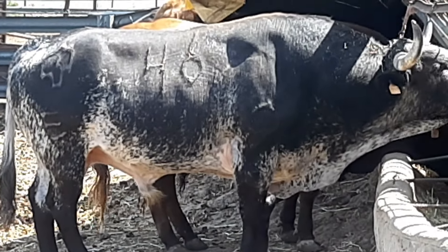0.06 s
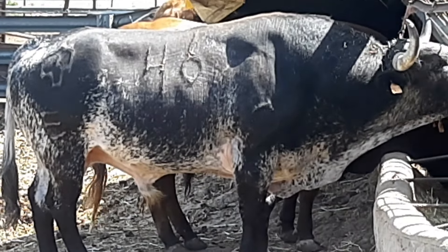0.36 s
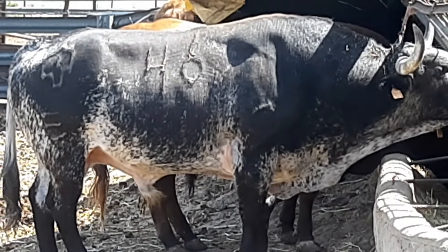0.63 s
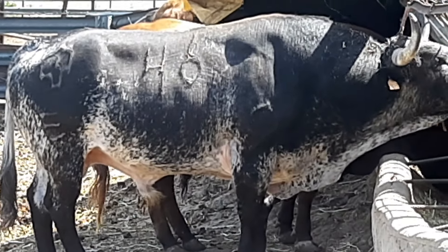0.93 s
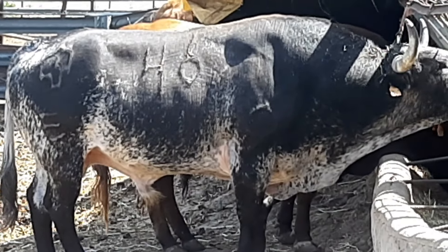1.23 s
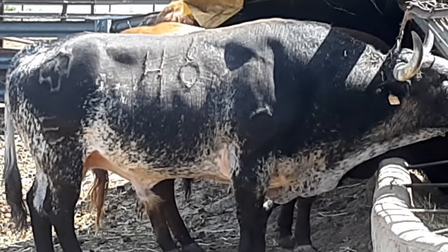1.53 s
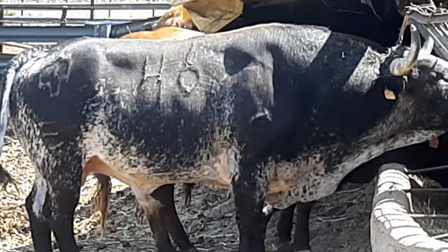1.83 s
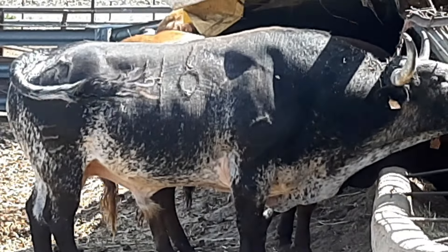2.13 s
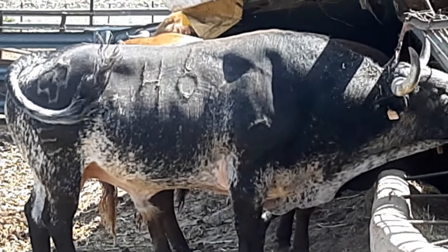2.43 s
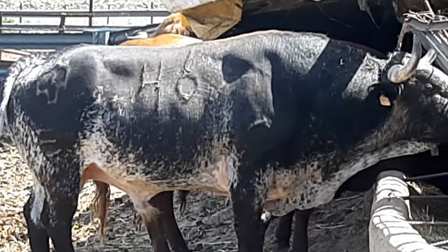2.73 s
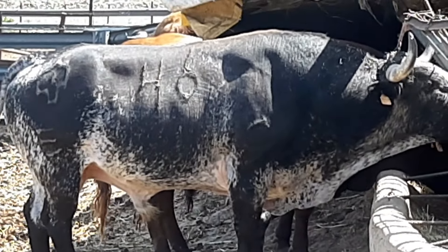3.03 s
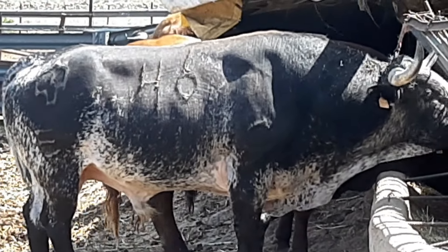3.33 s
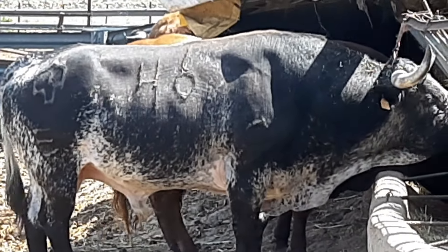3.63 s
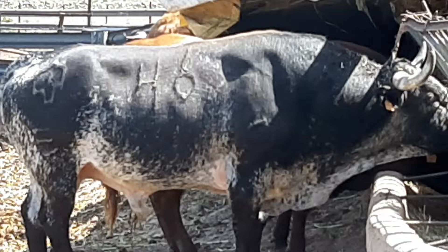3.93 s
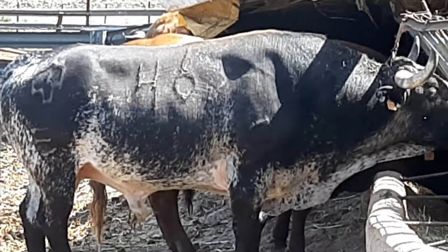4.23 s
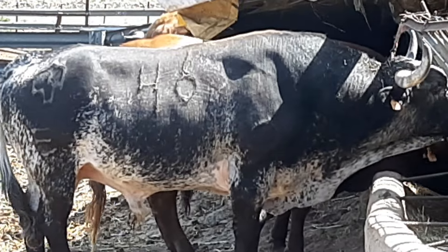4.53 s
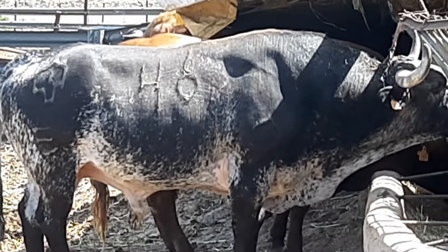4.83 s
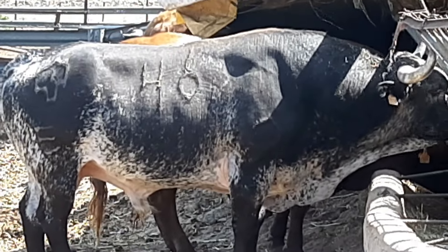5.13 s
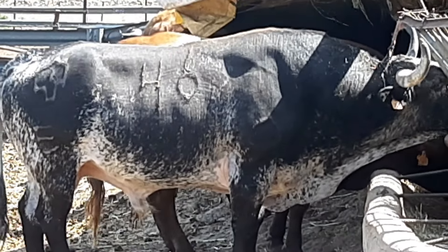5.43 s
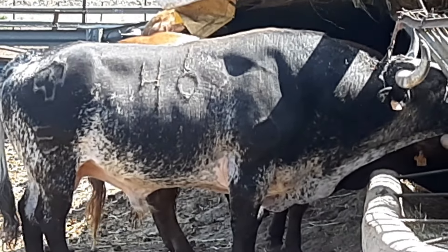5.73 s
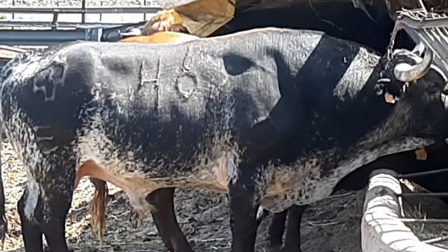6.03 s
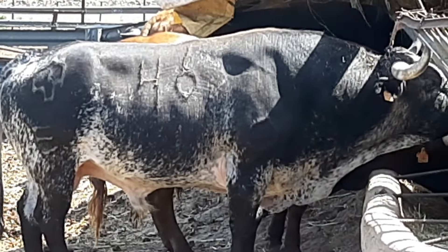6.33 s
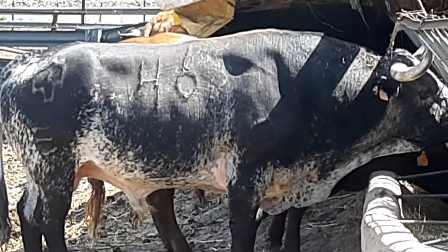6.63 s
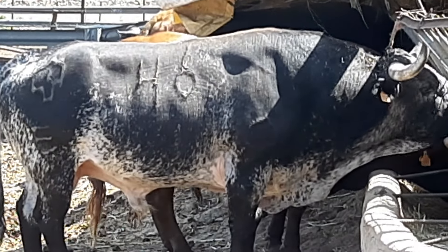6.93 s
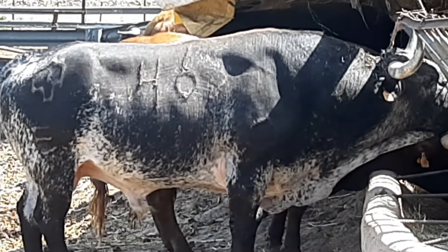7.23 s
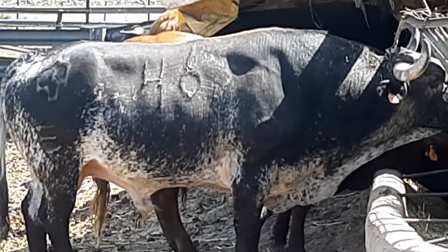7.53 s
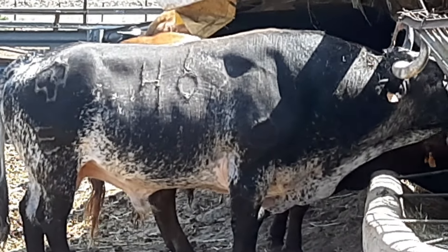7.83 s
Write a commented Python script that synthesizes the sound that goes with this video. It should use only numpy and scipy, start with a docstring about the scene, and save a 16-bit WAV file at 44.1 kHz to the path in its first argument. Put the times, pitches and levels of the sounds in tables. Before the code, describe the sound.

Wind buffets the microphone with low thumps at the start, then eases. A small bird chirps short phrases nearby while bulls quietly rummage and crunch dry feed, with faint tail swishes and light knocks on the trough. Near the end a horn scrapes a steel feeder with a short, ringing squeal. The outdoor pen is heard on the right, with a few dull finger bumps on the left.

```python
"""Bulls at a feed trough

Under a shed roof, muzzles rummage and crunch in dry feed, a tail swishes, and a horn scrapes the steel
feeder, whose resonances are driven by friction. A small bird whistles two phrases nearby and another
calls farther off. Turbulent wind buffets the open right microphone; the covered left one gives its
own hiss, a few finger bumps and only a trace of the pen."""
import sys
import numpy as np
from scipy import signal
from scipy.fft import rfft, irfft, next_fast_len
from scipy.io import wavfile
from scipy.ndimage import uniform_filter1d

SR = 44100
rng = np.random.default_rng(int(sys.argv[2]) if len(sys.argv) > 2 else 0)


def materialize(psi):
    """Save the field psi as 16-bit PCM at rate SR to the path in sys.argv[1].

    A 1-D psi becomes a single channel; in a 2-D psi each row is a channel.
    """
    bounded = np.clip(np.atleast_2d(psi).T, -1, 1)
    quanta = np.round(bounded * 32767).astype(np.int16)
    wavfile.write(sys.argv[1], SR, quanta)


N = 346961
TIME = np.arange(N) / SR


def from_db(db):
    """Amplitude ratio of a level; all levels are relative, ahead of the mixing gains."""
    return 10 ** (np.asarray(db) / 20)


def rms_one(x):
    """Normalisation to unit power."""
    return x / np.sqrt(np.mean(x ** 2) + 1e-20)


def colour(x, spectrum):
    """Spectral shaping at unit power, falling 24 dB per octave beyond the listed band."""
    hz, level_db = np.transpose(spectrum)
    size = next_fast_len(N)
    bins = np.maximum(np.fft.rfftfreq(size, 1 / SR), 1)
    outside_db = 24 * abs(np.log2(bins / np.clip(bins, hz[0], hz[-1])))
    gain = from_db(np.interp(np.log(bins), np.log(hz), level_db) - outside_db)
    return rms_one(irfft(rfft(x, size) * gain, size)[:N])


def noise(spectrum):
    """Gaussian noise with a given spectrum."""
    return colour(rng.standard_normal(N), spectrum)


def drift(per_s):
    """Random modulation of unit power, interpolated between independent values."""
    knots = rng.standard_normal(6000)
    return rms_one(np.interp(TIME * per_s, np.arange(len(knots)), knots))


def grains(per_s, spread_db, smooth):
    """Shot noise: random snaps of uneven size over a smooth friction noise."""
    sizes = from_db(spread_db * np.minimum(rng.exponential(1, N), 4)) * rng.choice([-1, 1], N)
    snaps = rms_one(sizes * (rng.random(N) < per_s / SR))
    return rms_one(snaps + smooth * rng.standard_normal(N))


def resonate(x, hz, width_hz):
    """A damped two-pole resonator with unit peak gain."""
    r = np.exp(-np.pi * width_hz / SR)
    feedback = [1, -2 * r * np.cos(2 * np.pi * hz / SR), r * r]
    return signal.lfilter(np.array([1, 0, -1]) * (1 - r * r) / 2, feedback, x)


def shed(x, early_db, early_t60, tail_db, tail_t60):
    """Reverberation: direct sound, sparse reflections from roof and rails, and a diffuse tail."""
    t = TIME[:SR]
    decays = from_db(-60 * t / np.array([[early_t60], [tail_t60]])) * (t > .004)
    early, tail = rng.standard_normal((2, SR)) * decays
    early *= rng.random(SR) < 700 / SR
    response = (from_db(early_db) * rms_one(early) + from_db(tail_db) * rms_one(tail)) / np.sqrt(SR)
    response[0] = 1
    return signal.fftconvolve(x, response / np.linalg.norm(response))[:N]


def swells(rows):
    """An envelope made of Gaussian swells."""
    return sum(from_db(db) * np.exp(-((TIME - s) / half_width) ** 2) for s, db, half_width in rows)


def swell_and_fade(peak_s, swell_s, t60):
    """An envelope with quadratic growth and exponential decay."""
    growth = np.clip((TIME - peak_s) / swell_s + 1, 0, 1) ** 2
    return growth * from_db(-60 * np.maximum(TIME - peak_s, 0) / t60)


def held(full_s, hold_s, db, t60, rise_db_per_s):
    """An envelope with exponential growth until full_s, a plateau and exponential decay."""
    attack_db = rise_db_per_s * np.maximum(full_s - TIME, 0)
    decay_db = 60 * np.maximum(TIME - full_s - hold_s, 0) / t60
    return from_db(db - attack_db - decay_db) + 1e-12


def pressure_pulses(rows, cycles):
    """Gaussian-windowed sines: each is one smooth push and pull on the diaphragm."""
    out = np.zeros(N)
    for centre_s, db, hz in rows:
        near = abs(TIME - centre_s) < 2 / hz
        turns = hz * (TIME[near] - centre_s)
        out[near] -= from_db(db) * np.sin(2 * np.pi * turns) * np.exp(-(turns / cycles) ** 2)
    return out


# Spectrum of the outdoor background: frequency_hz, density_db
YARD_SPECTRUM = [(30, -3), (70, 1.5), (140, -3), (250, -15), (380, -9.5), (620, -7.5), (1100, -20.5),
                 (2600, -27), (4200, -20), (5600, -20.5), (6900, -15.5), (8300, -32.5), (15000, -30)]

def yard():
    """Ambient noise: a faint broad band whose level barely wavers."""
    return from_db(-73) * noise(YARD_SPECTRUM) * from_db(0.21 * drift(2.8))


# Spectrum of a microphone's own noise: frequency_hz, density_db
SELF_NOISE_SPECTRUM = [(25, 1), (90, 2.5), (170, -16), (300, -18.5), (1000, -24.5), (3000, -26.5),
                       (8500, -28.5), (11500, -25.5), (16000, -26)]

def microphone_hiss():
    """Self-noise: a steady floor, independent in each microphone."""
    return from_db(-70) * noise(SELF_NOISE_SPECTRUM)


# Spectra of large eddies and small whirls: frequency_hz, density_db
EDDY_SPECTRUM = [(25, -28.5), (55, 3), (85, 6.5), (150, -1), (215, -12.5), (310, -15.5), (600, -43.5),
                 (1200, -74.5)]
WHIRL_SPECTRUM = [(280, 12), (400, 1), (600, -8), (900, -25)]
# Gusts on the open microphone: centre_s, level_db, half_width_s
WIND_GUSTS = [(.004, -22, 0.017), (.14, -46.5, 0.069), (.335, -55, 0.013), (.44, -45.5, 0.086),
              (.605, -32, 0.024), (.77, -49, 0.053), (.96, -46.5, 0.072), (1.14, -49, 0.049),
              (1.33, -55, 0.046), (1.55, -60, 0.078), (1.71, -58.5, 0.068), (2.02, -60.5, 0.02),
              (2.57, -56, 0.053), (3.31, -63, 0.032), (3.47, -62, 0.074), (3.72, -63, 0.05),
              (4.55, -69.5, 0.072), (4.94, -66.5, 0.061), (5.41, -66, 0.022), (5.63, -60.5, 0.023),
              (6.15, -62.5, 0.089), (6.66, -49.5, 0.023), (6.75, -51, 0.046), (6.88, -50, 0.064),
              (7.1, -56, 0.031), (7.25, -52.5, 0.07), (7.34, -52.5, 0.033), (7.53, -65, .05)]
# Single puffs of air: centre_s, level_db, frequency_hz
WIND_PUFFS = [(.139, -31, 140), (.327, -30.5, 109), (.414, -30.5, 146), (.503, -24.5, 144.7),
              (.516, -29.5, 151), (.5925, -8.5, 130), (.6065, -19, 119.5), (.621, -22.5, 140),
              (.657, -31, 113), (.710, -22, 88.7), (.922, -27, 121), (.948, -31, 120), (1.122, -31.5, 110),
              (1.161, -29, 113), (2.619, -40.5, 117.5), (6.871, -39, 89), (7.22, -34, 97)]

def wind():
    """Turbulence: eddies vary the pressure at the port, and strong puffs break up into small whirls."""
    breeze = from_db(-53 - 15 * TIME) + from_db(-83.5)  # dies away to a lull
    strength = breeze + swells(WIND_GUSTS)
    eddies = rms_one(noise(EDDY_SPECTRUM) * from_db(3.6 * drift(45)))
    puffs = from_db(-5) * pressure_pulses(WIND_PUFFS, cycles=0.49)
    puff_envelope = np.sqrt(np.maximum(uniform_filter1d(puffs ** 2, size=300), 0))
    whirls = from_db(-19.5) * puff_envelope * noise(WHIRL_SPECTRUM)
    return strength * eddies + puffs + whirls


# Spectrum of sliding straw: frequency_hz, density_db
STRAW_SPECTRUM = [(2000, -17.5), (3200, -10), (4200, -1.5), (5500, -1.5), (6900, -2), (7600, -10.5),
                  (8400, -35.5), (14000, -33)]
# Moments when the straw comes to rest: centre_s, half_width_s
STRAW_RESTS = [(0.688, 0.051), (1.53, 0.13), (3.16, 0.18), (3.844, 0.06), (6.796, 0.29)]
# Tufts being pulled: centre_s, level_db, half_width_s
STRAW_TUFTS = [(.45, -73, 0.024), (1.79, -77, 0.043), (2.51, -70.5, 0.019), (2.73, -73.5, 0.073),
               (3.33, -70.5, 0.038), (3.97, -75.5, 0.063), (4.05, -60, 0.018), (5.08, -78.5, 0.04),
               (5.58, -72.5, 0.033), (5.92, -80, 0.21), (7.04, -76, 0.05), (7.86, -74, 0.034)]

def straw():
    """Sliding friction: loose stalks rustle unevenly, rest at times and swell when a tuft is pulled."""
    rustle = colour(grains(per_s=4000, spread_db=3, smooth=.6), STRAW_SPECTRUM)
    moving = np.prod([1 - np.exp(-((TIME - s) / width) ** 2) for s, width in STRAW_RESTS], axis=0)
    sliding = moving * from_db(-76 + 2 * drift(11))
    return (sliding + swells(STRAW_TUFTS)) * rustle


# Contour of each bird syllable, by name: offset_s, pitch_hz, level_db
SYLLABLE_CONTOURS = { "lift": [(0, 3970, 1), (.04, 3960, -6), (.08, 3830, -2), (.105, 4050, 1),
                     (.125, 4650, 4)], "rise": [(0, 2950, -19), (.022, 2980, -3.5), (.032, 3120, 1.5),
                     (.055, 3700, -1.5), (.072, 4100, 1), (.092, 4260, -16.5)], "flick": [(0, 5470, -5),
                     (.015, 6300, 5), (.035, 6200, -20)], "flourish": [(0, 3150, -21), (.017, 5250, -17),
                     (.022, 4180, -11), (.036, 4060, 0), (.044, 3300, -16), (.054, 3100, -17),
                     (.067, 3750, -4), (.074, 3200, -11), (.086, 3200, -10), (.097, 2750, -20),
                     (.122, 2450, -19)], "drop": [(0, 2814, -11), (.02, 2667, 4), (.035, 2380, 7),
                     (.055, 2020, -0.5)], "tick": [(0, 5650, -7), (.014, 5880, 0), (.021, 5300, -1),
                     (.034, 4050, -6)], "swoop": [(0, 6000, -7), (.023, 5280, -3), (.044, 5750, -7),
                     (.072, 4400, 0), (.097, 2650, -4)], "buzz": [(0, 3006, -1.5), (.03, 3910, 7.5),
                     (.075, 4400, -3)], "pip": [(0, 3880, 0), (.03, 3790, 7), (.07, 3810, 2)]}
# Hoarseness of each syllable, by name: rms_pitch_fraction
SYLLABLE_RASP = {"lift": .008, "rise": .021, "flourish": .062, "drop": .06, "tick": .052, "swoop": .03,
                 "buzz": .095, "pip": .003, "flick": .04}

def whistles(calls):
    """Frequency modulation: each syllable is a gliding tone with a faint octave, hoarse with quiver."""
    out, quiver, flutter_db = np.zeros(N), drift(700), 1.6 * drift(150)
    for start_s, name, level_db in calls:
        offset_s, hz, contour_db = np.transpose(SYLLABLE_CONTOURS[name])
        span = (TIME >= start_s) & (TIME < start_s + offset_s[-1])
        t = TIME[span] - start_s
        fade = np.clip(np.minimum(t, offset_s[-1] - t) / 0.0013, 0, 1)
        pitch_hz = np.interp(t, offset_s, hz) * (1 + SYLLABLE_RASP[name] * quiver[span])
        phase = 2 * np.pi * np.cumsum(pitch_hz) / SR
        tone = np.sin(phase) + from_db(-37) * np.sin(2 * phase)
        out[span] += fade * from_db(level_db + np.interp(t, offset_s, contour_db) + flutter_db[span]) * tone
    return out


# Syllables of the near and the far bird: start_s, syllable, level_db
NEAR_BIRD_SONG = [(0.051, "lift", -64.5), (0.334, "rise", -60), (.55, "rise", -60), (0.772, "flick", -68),
                  (0.786, "flourish", -40), (0.929, "drop", -69), (1.035, "drop", -64),
                  (1.149, "tick", -56), (1.194, "tick", -55.5), (1.24, "tick", -57), (2.49, "flick", -65),
                  (2.503, "flourish", -43), (2.972, "pip", -75), (4.12, "lift", -64.5),
                  (4.397, "rise", -59.5), (4.611, "rise", -54.5), (4.817, "rise", -54.5),
                  (4.976, "drop", -65.5), (5.088, "drop", -62.5), (5.2, "tick", -59.5),
                  (5.244, "tick", -57), (5.292, "tick", -62)]
FAR_BIRD_CALLS = [(3.571, "swoop", -62), (3.675, "buzz", -61.5), (6.35, "swoop", -64.5),
                  (6.44, "buzz", -68)]

def birds():
    """Direct-to-reverberant ratio falls with distance: the far bird carries a little more echo."""
    near = shed(whistles(NEAR_BIRD_SONG), early_db=-4.5, early_t60=0.2, tail_db=-8.5, tail_t60=0.57)
    far = shed(whistles(FAR_BIRD_CALLS), early_db=-3, early_t60=0.13, tail_db=-8, tail_t60=0.55)
    return near + far


# Spectra of dull pushing, hollow grinding and bright crunching: frequency_hz, density_db
PUSH_SPECTRUM = [(130, 4), (220, 8.5), (380, 9.5), (600, 4), (850, -2), (1150, -13), (2000, -42.5)]
GRIND_SPECTRUM = [(520, 1), (720, 4), (900, -1), (1070, 0), (1300, -5), (1550, -1.5), (1850, -8.5),
                  (3000, -30.5), (5000, -35)]
CRUNCH_SPECTRUM = [(1200, -6.5), (1700, 2.5), (2300, 5), (2600, 7), (3000, 9.5), (3600, 10.5), (4050, 10),
                   (4500, 1), (7000, -14), (8500, -37)]
# Muzzle strokes in the feed: peak_s, swell_s, t60_s, push_db, grind_db, crunch_db
MUZZLE_STROKES = [(.22, 0.14, 0.71, -63, -79, -84), (.59, 0.095, 0.24, -56.5, -92, -82),
                  (1.331, 0.053, 0.78, -73, -102, -76), (2.38, 0.17, 3.2, -77.5, -83, -88),
                  (3.432, 0.091, 0.79, -64.5, -64.5, -65), (4.048, 0.068, 1.14, -65.5, -68, -69.5),
                  (4.68, 0.023, 0.25, -76, -73, -100), (4.759, 0.024, 0.71, -80, -69.5, -95),
                  (5.524, 0.025, 0.9, -76.5, -96, -64.5), (5.579, 0.0059, 0.042, -100, -68, -58),
                  (5.72, 0.1, 0.33, -64, -71.5, -77), (5.774, 0.01, 0.19, -75, -63.5, -75),
                  (6.079, 0.024, 1.7, -59.5, -79.5, -88), (6.128, 0.047, 0.18, -90, -72, -71),
                  (6.695, 0.021, 0.65, -65, -67, -66), (7.35, 0.3, 2.7, -68.5, -71.5, -99.5)]

def feeding():
    """Granular friction and fracture: muzzles push, grind and snap dry feed, amid straw and knocks."""
    push, grind, crunch = sum(from_db(levels_db)[:, None] * swell_and_fade(peak_s, swell_s, t60)
                              for peak_s, swell_s, t60, *levels_db in MUZZLE_STROKES)
    feed = push * colour(grains(per_s=600, spread_db=0, smooth=0.62), PUSH_SPECTRUM)
    feed += grind * colour(grains(per_s=700, spread_db=3, smooth=.5), GRIND_SPECTRUM)
    feed += crunch * colour(grains(per_s=900, spread_db=2.5, smooth=.5), CRUNCH_SPECTRUM)
    feed *= from_db(1.95 * drift(70))
    return shed(feed + straw() + knocks(), early_db=-6.5, early_t60=0.21, tail_db=-21.5, tail_t60=0.49)


# Finger bumps on the covered microphone: centre_s, level_db, frequency_hz
FINGER_BUMPS = [(1.3695, -27, 135), (1.397, -38, 128), (1.4175, -34.5, 141.4), (7.518, -29.5, 131),
                (7.549, -33, 126), (7.6, -47, 129), (7.66, -46, 116), (7.725, -44.5, 115)]

def finger():
    """Handling noise: low pressure pulses at the covered port, with a small tick at first touch."""
    first_touch_s = FINGER_BUMPS[0][0] - .002
    tick = noise([(500, 18), (2200, -14), (3500, -16), (7000, -12)])
    tick *= from_db(-41.5) * swell_and_fade(first_touch_s, swell_s=0.00014, t60=0.0086)
    return tick - pressure_pulses(FINGER_BUMPS, cycles=0.36)


# Strokes of a tail: centre_s, level_db, half_width_s
TAIL_SWISHES = [(1.78, -63, .035), (2.735, -66, 0.032)]
# Spectrum of brushing hair: frequency_hz, density_db
HAIR_SPECTRUM = [(2500, -18), (4000, 4), (7000, 4), (8400, -12), (13000, -6), (16000, -28)]

def tail_swish():
    """Friction noise: coarse hair brushes over the hide in many tiny contacts."""
    return swells(TAIL_SWISHES) * colour(grains(per_s=10000, spread_db=-1, smooth=0.5), HAIR_SPECTRUM)


# Muzzles and hard feed striking the trough: peak_s, level_db, resonance_hz
TROUGH_KNOCKS = [(3.432, -60, 1550), (3.434, -70, 3420), (4.756, -73, 1060), (4.785, -62, 730),
                 (5.587, -66.5, 1610), (5.594, -65, 3620), (5.769, -65, 1460), (6.078, -66, 380),
                 (6.688, -62.5, 3540), (6.699, -59.5, 2260)]

def knocks():
    """Impact excitation: a short gritty chatter rings the resonance of the spot that is hit."""
    out = np.zeros(N)
    chatter = grains(per_s=900, spread_db=2.5, smooth=.3)
    crack = from_db(-14.5) * colour(chatter, CRUNCH_SPECTRUM)
    for peak_s, db, hz in TROUGH_KNOCKS:
        ring = rms_one(resonate(chatter, hz, width_hz=93))
        out += from_db(db) * swell_and_fade(peak_s, swell_s=0.0045, t60=0.14) * (ring + crack)
    return out


# Squeals as the horn takes hold and slides off: full_s, hold_s, level_db, t60_s, pitch_hz, sag_hz_per_s
STEEL_SQUEALS = [(7.084, 0.03, -43, 0.31, 1177, 1307), (7.331, 0.125, -58.5, 0.59, 1263, 547)]
# Overtones of the squeal at its loudest: harmonic_number, level_db
SQUEAL_OVERTONES = [(2, -5), (3, -11), (4, -13)]

def squeal():
    """Stick-slip oscillation: horn on steel gives a quivering, sagging tone, harsher when loud."""
    out, quiver = 0, 1 + 0.014 * drift(150)
    loudest = from_db(max(row[2] for row in STEEL_SQUEALS))
    for full_s, hold_s, db, t60, hz, sag in STEEL_SQUEALS:
        level = held(full_s, hold_s, db, t60, rise_db_per_s=898)
        pitch_hz = (hz - sag * np.clip(TIME - full_s, -hold_s, hold_s)) * quiver
        phase = 2 * np.pi * np.cumsum(pitch_hz) / SR
        overtones = sum(from_db(gain_db) * np.sin(round(k) * phase) for k, gain_db in SQUEAL_OVERTONES)
        harshness = (level / loudest) ** 0.48
        out += level * (np.sin(phase) + harshness * overtones)
    return out * from_db(1.1 * drift(90))


# Shoves of the horn along the feeder: full_s, hold_s, level_db, t60_s
HORN_SHOVES = [(7.092, 0.055, -37.5, 0.25), (7.244, 0.06, -56.5, 0.57)]
# Resonances of the steel feeder: frequency_hz, bandwidth_hz, gain_db
FEEDER_MODES = [(694, 49, -6), (1106, 6.8, 8.5), (1200, 30, 5), (2076, 30, 2), (2198, 68, 7.5),
                (2278, 39, 6), (2360, 40, 1), (3060, 75, -16), (3720, 170, 2.5), (3970, 140, 4.5),
                (4060, 50, 4), (4270, 90, 1), (6740, 260, -18)]
# Spectrum of the scrape's grit: frequency_hz, density_db
GRIT_SPECTRUM = [(700, -21), (1050, 9), (1400, 0.5), (2300, 7.5), (2900, -2.5), (3900, 1), (5000, -19),
                 (7200, -5), (8600, -55), (10800, -22), (15000, -45)]

def horn_scrape():
    """Forced vibration: friction drives the feeder's modes; grit builds up and outlasts them."""
    force = sum(held(*shove, rise_db_per_s=1049) for shove in HORN_SHOVES)
    friction = rng.standard_normal(N) * from_db(2 * drift(200))
    steel = rms_one(sum(from_db(db) * resonate(friction, hz, width) for hz, width, db in FEEDER_MODES))
    steel = signal.sosfilt(signal.butter(6, 7400, fs=SR, output="sos"), steel)
    dug_in_s, rise_db_per_s = 7.122, 352  # the grit grows as the horn digs in
    digging = from_db(-46 - rise_db_per_s * np.clip(dug_in_s - TIME, 0, .1))
    grit = colour(grains(per_s=3600, spread_db=1.5, smooth=0.62), GRIT_SPECTRUM)
    grit *= digging * (force / force.max()) ** 0.67
    scrape = from_db(-4) * force * steel + grit + squeal() + feeder_ring()
    return shed(scrape, early_db=-3, early_t60=0.19, tail_db=-10.5, tail_t60=0.32)


# Ringing partials of the steel feeder: frequency_hz, level_db, t60_s
FEEDER_RING = [(1433, -54.5, .7), (2190, -68, 1.3), (2315, -64, 0.97), (2492, -60, .7), (3914, -53.5, 0.39),
               (3970, -67, 0.72)]

def feeder_ring(jolt_s=7.232, attack_s=0.0073):
    """Free vibration: the steel feeder rings on after the horn's second shove."""
    t = np.maximum(TIME - jolt_s, 0)
    ring = sum(from_db(db - 60 * t / t60) * np.sin(2 * np.pi * hz * t) for hz, db, t60 in FEEDER_RING)
    return np.minimum(t / attack_s, 1) * ring


def scene():
    """Superposition: the pen reaches the right microphone and leaks, dulled by a finger, into the left."""
    pen = from_db(5) * (yard() + birds() + feeding() + tail_swish() + horn_scrape())
    leak = from_db(-44.5) * signal.sosfilt(signal.butter(1, 1500, fs=SR, output="sos"), pen)
    left = leak + microphone_hiss() + finger()
    right = pen + microphone_hiss() + from_db(7) * wind()
    return np.array([left, right])


def record(dry, fade_s=.004, cutoff_hz=15750):
    """Band limiting: a steep low-pass cuts the top treble after a brief fade-in."""
    fade_in = np.minimum(TIME / fade_s, 1)
    return signal.sosfilt(signal.ellip(12, .1, 90, cutoff_hz, fs=SR, output="sos"), dry * fade_in)


dry = scene()
out = record(dry)
materialize(out)
```